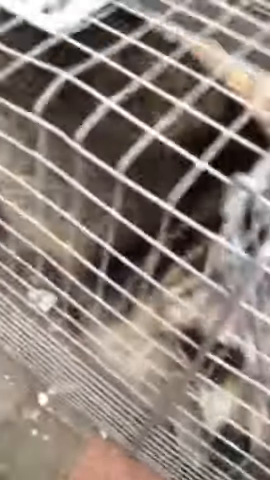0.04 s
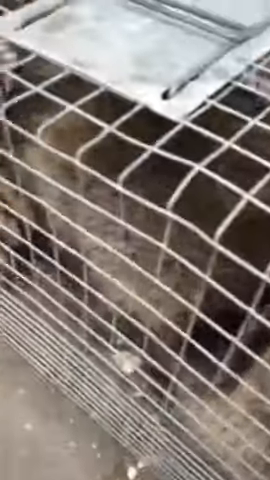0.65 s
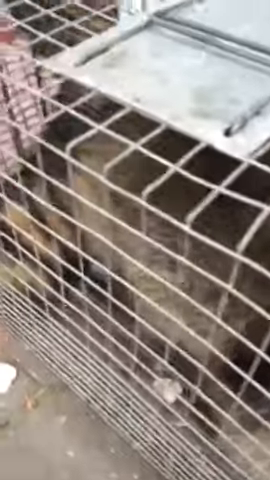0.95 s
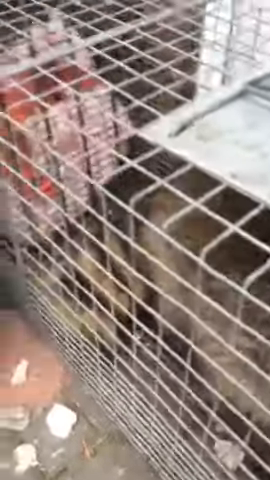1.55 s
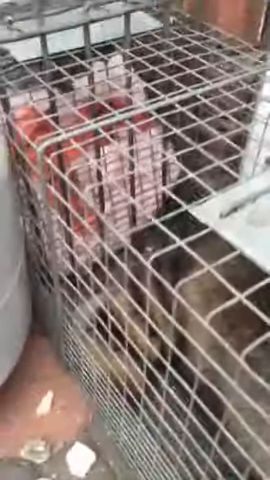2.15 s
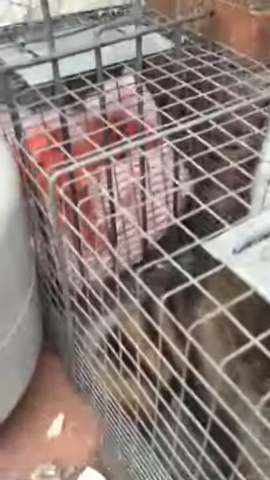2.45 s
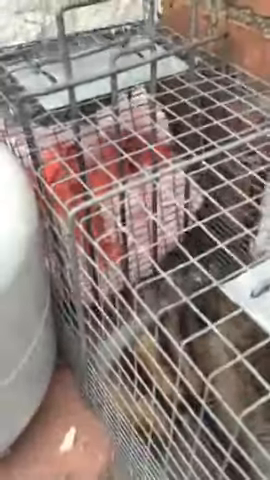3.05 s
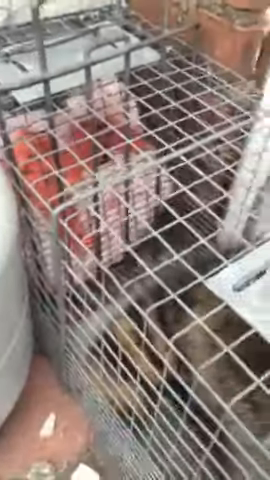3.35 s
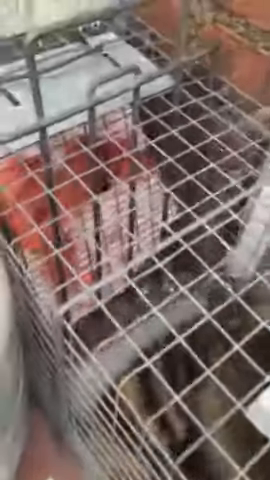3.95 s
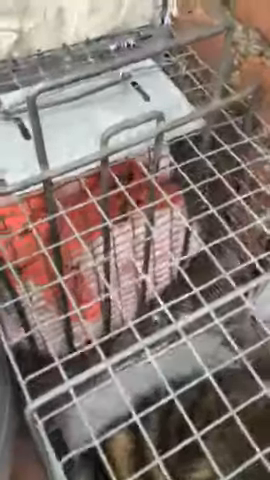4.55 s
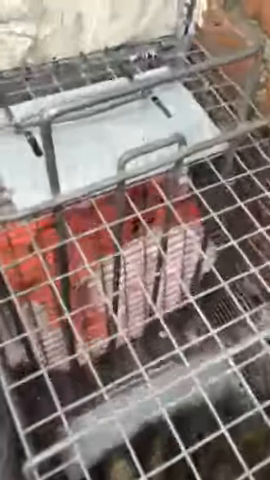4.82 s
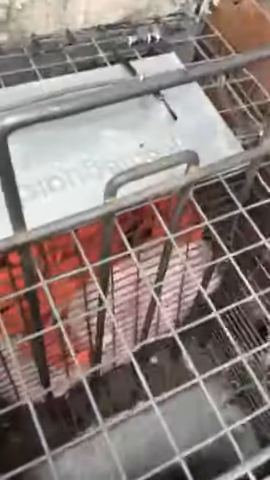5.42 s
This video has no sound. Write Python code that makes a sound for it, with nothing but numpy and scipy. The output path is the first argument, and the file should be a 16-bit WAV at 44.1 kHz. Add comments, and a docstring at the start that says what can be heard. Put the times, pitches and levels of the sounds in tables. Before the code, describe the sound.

Baby raccoons trill in rapid bursts of high, whistled chirps over a low outdoor rumble, with soft microphone bumps.

```python
"""Baby raccoons trill in wire cages on a patio, beside a brick wall.
Each trill is a run of whistled chirps, about 14 a second; between chirps the voice breaks down to a
low dip and climbs back. The harder a cub pushes, the wider its mouth and the more its chirps swell
and turn rough. Under it lie a low outdoor rumble, a machine hum, a few short, bright hisses
and some soft bumps on the hand-held microphone."""
import sys
import numpy as np
from scipy import signal
from scipy.fft import rfft, irfft, next_fast_len
from scipy.io import wavfile
from scipy.ndimage import uniform_filter1d

SR = 44100
rng = np.random.default_rng(int(sys.argv[2]) if len(sys.argv) > 2 else 0)


def output_pcm(signal):
    """Save a mono or channel-first signal as 16-bit PCM at the path in sys.argv[1].

    Samples are clipped to [-1, 1] before scaling.
    """
    pcm = np.clip(np.atleast_2d(signal).T, -1, 1) * 32767
    wavfile.write(sys.argv[1], SR, np.round(pcm).astype(np.int16))


N = 246078
TIME = np.arange(N) / SR


def from_db(db):
    """Turn decibels into a number to multiply by."""
    return 10 ** (np.asarray(db) / 20)


def mean_db(a, b):
    """The level halfway in power between two levels."""
    return 10 * np.log10((from_db(a) ** 2 + from_db(b) ** 2) / 2)


def rms_one(x):
    """Scale a signal to an average power of one."""
    return x / np.sqrt(np.mean(x ** 2) + 1e-20)


def in_time(rows):
    """Join timed points with straight lines, one curve for each column after the time."""
    times, *columns = np.transpose(rows)
    return [np.interp(TIME, times, column) for column in columns]


def humps(rows):
    """A gain that rises and falls around each (time_s, peak_db, width_s)."""
    return sum(from_db(db) * np.exp(-.5 * ((TIME - s) / width) ** 2) for s, db, width in rows)


def bins(x):
    """The frequencies in a signal's spectrum."""
    return np.maximum(np.arange(len(x) // 2 + 1) * SR / len(x), 1)


def colour(x, spectrum, extra_db=0):
    """Shape bass and treble with (freq_hz, gain_db) points, then scale to a power of one."""
    hz, db = np.transpose(spectrum)
    gain = from_db(np.interp(np.log(bins(x)), np.log(hz), db) + extra_db)
    return rms_one(irfft(rfft(x) * gain, len(x)))


def noise(spectrum, size=N):
    """Random noise with the given colour."""
    return colour(rng.standard_normal(size), spectrum)


def drift(size, rate):
    """A smooth random wobble that changes about rate times a second."""
    white = rng.standard_normal(next_fast_len(size + SR // 10))
    smooth = irfft(rfft(white) / (1 + (bins(white) / rate) ** 4), len(white))
    return rms_one(smooth)[:size]


def add(track, start, sound):
    """Mix a sound in at its start time."""
    at = max(round(start * SR), 0)
    track[at:at + len(sound)] += sound[:max(N - at, 0)]


# Colour of the rumble: freq_hz, gain_db
RUMBLE_COLOUR = [(12, -64), (20, -36), (32, -55), (40, -14), (50, -3), (81, 0.5), (102, -6), (118, -4),
                 (136, -6), (166, -20), (209, -42), (300, -27.5), (390, -65), (660, -120)]
# Its brief surges: time_s, peak_db, width_s
SURGES = [(0.14, -46.5, .09), (4.08, -46, 0.033)]
def rumble(steady_db=-44):
    """A deep outdoor rumble that surges twice."""
    return (from_db(steady_db) + humps(SURGES)) * noise(RUMBLE_COLOUR)


# Colour of the rustle: freq_hz, gain_db
RUSTLE_COLOUR = [(100, -0.5), (165, -2.5), (260, -7), (400, -19), (700, -15), (1200, -33), (2500, -41)]
# Its loudness before the trim: time_s, level_db
RUSTLE_LOUDNESS = [(0.0, -54), (0.31, -54), (0.59, -58), (1.06, -67), (1.2, -54.5), (3.59, -55),
                   (4.48, -45), (5.28, -51), (5.58, -50.5)]
def rustle(trim_db=0.5):
    """A low rustle that comes and goes."""
    return from_db(in_time(RUSTLE_LOUDNESS)[0] + trim_db) * noise(RUSTLE_COLOUR)


# Colour of the far-off noise: freq_hz, gain_db
WASH_COLOUR = [(200, -22), (330, 3.5), (430, 2), (600, 1), (1000, -5), (2500, -41)]
# Its loudness before the trim: time_s, level_db
WASH_LOUDNESS = [(0.0, -57), (0.33, -59.5), (1.2, -61.5), (2.11, -56.5), (2.87, -58.5), (4.57, -52.5),
                 (5.21, -71), (5.58, -76)]
def far_wash(trim_db=-3.5):
    """A soft wash of distant outdoor noise that fades near the end."""
    return from_db(in_time(WASH_LOUDNESS)[0] + trim_db) * noise(WASH_COLOUR)


# Colour of the air noise: freq_hz, gain_db
AIR_COLOUR = [(120, -36), (200, 4), (223, -2.5), (253, -5.5), (338, -7.5), (420, -3), (552, -16),
              (792, -9.5), (1060, -7.5), (1320, -9.5), (1490, -12.5), (1640, -12.5), (2530, -19.5),
              (6970, -22), (15200, -40.5)]
def air(level_db=-56.3):
    """The faint, steady hiss of the open air."""
    return from_db(level_db) * noise(AIR_COLOUR)


def wavering_tone(pitch_hz, waver=0.0204, throb_db=3.5):
    """A pure tone whose pitch and loudness wander a little."""
    phase = 2 * np.pi * np.cumsum(pitch_hz * (1 + waver * drift(N, rate=7.5))) / SR
    return from_db(throb_db * drift(N, rate=4.6)) * np.sin(phase)


# The machine's hum over time: time_s, pitch_hz, level_db
HUM_CURVE = [(0, 104, -45), (0.7, 101, -46.5), (1.4, 100, -44), (2.1, 105, -48), (3.9, 106, -43.5),
             (5.58, 107, -56)]
def machine_hum():
    """A machine hums on one low, unsteady note."""
    pitch_hz, level_db = in_time(HUM_CURVE)
    return from_db(level_db) * wavering_tone(pitch_hz)


# The drone's one swell: time_s, peak_db, width_s
DRONE_RISE = [(4.5, -47, 0.15)]
def drone(pitch_hz=249, steady_db=-67.5):
    """A higher tone, faint except for one swell."""
    return (from_db(steady_db) + humps(DRONE_RISE)) * wavering_tone(pitch_hz)


# Two faint swells: time_s, peak_db, width_s
FAR_SWELLS = [(0.42, -53.5, 0.2), (2.1, -58.5, 0.24)]
# Their colour: freq_hz, gain_db
FAR_SWELL_COLOUR = [(250, -30), (340, -3), (420, 4.5), (500, 2), (620, -23), (900, -59)]
def far_swells():
    """Something far off grows and fades with a fairly low sound."""
    return humps(FAR_SWELLS) * noise(FAR_SWELL_COLOUR)


# Bumps on the microphone: start_s, level_db, pitch_hz
MIC_BUMPS = [(0.105, -29, 120), (0.192, -31.5, 115), (1.366, -26.5, 92), (4.11, -23.5, 79),
             (4.86, -31.5, 98), (4.9464, -17.5, 85), (5.003, -31, 101), (5.0301, -30.5, 180)]
def bumps(decay_s=0.0087, tap_db=-17, tap_hz=420, tap_s=0.0024):
    """A knock on the microphone's case gives a brief tap and a low thud that dies quickly."""
    out, t = np.zeros(N), TIME[:SR // 10]
    tap = from_db(tap_db) * np.sin(2 * np.pi * tap_hz * t) * np.exp(-t / tap_s)
    for start, level_db, pitch_hz in MIC_BUMPS:
        thud = np.sin(2 * np.pi * pitch_hz * t) * np.exp(-t / decay_s)
        add(out, start, from_db(level_db) * (thud + tap))
    return out


# Echoes off the ground, cage plate and wall: delay_s, gain_db
NEAR_ECHOES = [(0.0023, -34), (0.0061, -17.5), (0.0099, -14.5)]
# Colour of the cage's ringing: freq_hz, gain_db
RING_COLOUR = [(1000, 9), (2500, 6.5), (3400, 10), (3900, 13.5), (4500, -14), (7000, 11), (14000, -41)]
def patio(x, ring_db=-19, ring_s=0.22):
    """Sound bounces off nearby surfaces and leaves the cage ringing faintly."""
    t = TIME[:SR // 2]
    ring = noise(RING_COLOUR, len(t)) * from_db(-60 * t / ring_s)
    response = from_db(ring_db) * rms_one(ring) / np.sqrt(len(t))
    response[0] = 1  # the sound that arrives directly
    for delay, db in NEAR_ECHOES:
        response[round(delay * SR)] += from_db(db)
    return signal.fftconvolve(x, response)[:N]


# Short hisses: time_s, peak_db, width_s
SHORT_HISSES = [(0.136, -63, 0.0036), (0.564, -51, 0.0032), (0.635, -51.5, 0.024), (3.548, -48, 0.0032),
                (3.551, -54.5, 0.025), (3.752, -61.5, 0.02), (4.215, -62, 0.0052)]
# Their colour: freq_hz, gain_db
HISS_COLOUR = [(600, -24), (1200, 8.5), (3000, 0), (5500, 6.5), (8000, -3.5), (12000, -4), (15000, -13)]
def short_hisses():
    """Short, bright hisses: the breathy edge of a cub's squeal, and light scrapes."""
    return humps(SHORT_HISSES) * noise(HISS_COLOUR)


def note_clock(length, fade_s=0.008):
    """Time within a note, and soft edges that overlap its neighbours."""
    t = np.arange(int((max(length, fade_s) + fade_s) * SR)) / SR - fade_s / 2
    edge = np.clip(np.minimum(t - t[0], t[-1] - t) / fade_s, 0, 1)
    return t, np.sin(edge * np.pi / 2)


def low_level(level_db, chirp_db, follows=0.52, usual_chirp_db=-45):
    """The voice's low parts change less in loudness than its chirps do."""
    return level_db + follows * (chirp_db - usual_chirp_db)


# Voice settings from gentle to harsh (doubling is how much every second vibration differs):
# overtone_db, doubling_0_to_1, swell_db, chirp_mouth_hz, dip_mouth_hz, dip_rasp_0_to_1
EFFORT_STEPS = [(-60, .4, -4.5, 2700, 3000, 0.4), (-59, 0.5, -6, 3800, 2700, 0.7),
                (-42.5, 0.28, -2, 4300, 2370, 0.52), (-37.5, 1, 3, 4280, 3080, 0.63)]
def effort(overtone_db):
    """Look up the voice's settings; louder overtones mean the cub is pushing harder."""
    levels, *settings = np.transpose(EFFORT_STEPS)
    return [np.interp(overtone_db, levels, setting) for setting in settings]


# Colour of the throat, changing between trills: start_s, list of (freq_hz, gain_db)
THROAT_COLOURS = [ (0.0, [(1500, -25), (2500, -3), (3050, -0.5), (3600, -7.5), (4350, 2.5), (4700, -2),
                  (5330, -1), (6700, -18), (7700, -4), (8400, -9), (11000, -22), (14500, -25)]),
                  (0.8, [(1500, -1), (2700, 0), (3400, -10), (4500, -8.5), (5600, -11), (7000, -8.5),
                  (8000, -21), (10000, -20), (14500, -48)]), (2.0, [(1500, -22), (2550, -4), (2950, -1.5),
                  (3500, 4), (3850, 7), (4300, -6), (4900, -12), (6400, -15.5), (9000, -34), (14500, -45)]),
                  (4.0, [(1500, -9), (2200, -2.5), (2600, 3.5), (2900, 2.5), (3320, -10), (3850, 3),
                  (4640, -4.5), (5050, -8.5), (5540, -4), (6170, -10.5), (6850, -8), (7500, -18.5),
                  (9500, -26), (14500, -38)]), (5.1, [(1500, -10), (2400, 1.5), (2810, -5), (3190, -4),
                  (3720, 2.5), (4050, -1.5), (4680, 2.5), (5030, -4), (5450, -13.5), (6000, -11),
                  (6500, -12.5), (7400, -6.5), (9600, -22.5), (14500, -37)]), ]
def voice(start, pitch, tone_db, overtone_db, mouth_hz, rasp, doubling,
          undertone_db=-90, mouth_octaves=0.52, mouth_depth_db=5):
    """Vocal folds make a tone, throat and mouth shape its overtones, and rasp adds shake and hiss."""
    waver, jitter_radians, hiss, tremble_db = 0.015, 0.36, 0.75, 2.5
    size, rasp = len(pitch), np.clip(rasp, 0, 1)
    phase = 2 * np.pi * np.cumsum(pitch * (1 + waver * drift(size, rate=170))) / SR
    phase = phase + jitter_radians * rasp * drift(size, rate=720)
    # in a very hoarse note even the main tone turns to noise
    hoarse = rms_one(1 - rasp ** 3 + rasp ** 3 * drift(size, rate=790))
    # when every second vibration differs, tones appear an octave down and between the overtones
    undertone = from_db(undertone_db) * rms_one(np.sin(phase / 2))
    tone = from_db(tone_db) * rms_one(np.sin(phase)) + undertone
    whole = sum(np.sin(k * phase + rng.uniform(0, 2 * np.pi)) for k in range(2, 7))
    between = sum(np.sin((k - .5) * phase + rng.uniform(0, 2 * np.pi)) for k in range(2, 7))
    breath = rng.standard_normal(size) * (1 + .5 * np.sin(phase))
    source = rms_one(whole + doubling * between) * (1 - rasp ** 2) + hiss * rasp ** 2 * breath
    throat = [points for since, points in THROAT_COLOURS if since <= max(start, 0)][-1]
    octaves_away = np.log2(bins(source) / mouth_hz)
    mouth_db = -mouth_depth_db * np.log10(1 + (octaves_away / mouth_octaves) ** 4)
    overtones = colour(source, throat, mouth_db)
    # steady lung pressure holds the loudness even, however rough the voice
    overtones = overtones / np.sqrt(uniform_filter1d(overtones ** 2, size=130) + 1e-9)
    tremble = rms_one(from_db(tremble_db * drift(size, rate=117)))
    return tremble * (hoarse * tone + from_db(overtone_db) * overtones)


# The cubs' chirps, from faint whimpers to harsh trills (the accent is for the dip that follows):
# start_s, end_s, pitch_hz, glide_octaves, tone_db, overtone_db, rasp_0_to_1, accent_db
CUB_CHIRPS = [ (0.004, 0.034, 2150, -0.22, -58, -82, 1, -11), (0.056, 0.108, 2150, 0, -59.5, -65, .9, -2),
              (0.112, 0.126, 1680, -0.27, -50, -77, .15, -18),
              (0.407, 0.439, 2170, 0.24, -53.5, -64, 0.76, 0),
              (0.468, 0.496, 2230, -0.12, -44, -50, 0.66, 5), (0.517, 0.556, 2320, 0.14, -42, -47, .2, 6),
              (0.588, 0.626, 2150, -0.13, -41, -37, 0.4, 8.5),
              (0.65, 0.659, 1950, -.2, -41.5, -52, .3, -14),
              (0.907, 0.941, 1080, 0.066, -53, -62.5, 0.85, 5), (0.953, 0.985, 2150, .15, -57, -79, 0.6, 6),
              (1.035, 1.067, 2110, 0.18, -52.5, -84, .25, 9), (1.101, 1.136, 2180, 0.27, -45, -69, 0.4, 11),
              (1.176, 1.207, 2220, 0.13, -41, -60, 0.2, 10), (1.227, 1.264, 2220, 0.23, -42, -63, 0.3, 8),
              (1.29, 1.347, 2130, 0.23, -41.5, -63, 0.47, 3),
              (1.366, 1.412, 2170, .15, -37.5, -60.5, 0.35, 3),
              (1.434, 1.475, 2020, 0.078, -40.5, -63, 0.45, 0),
              (1.478, 1.527, 2310, -0.081, -55, -64, 0.68, 0),
              (1.53, 1.577, 1720, -0.38, -54.5, -71, .8, -7),
              (2.114, 2.131, 1390, -0.27, -53, -71, 0.84, -12),
              (2.157, 2.19, 1920, 0.016, -59, -69, 0.66, -7),
              (2.292, 2.346, 1850, 0.074, -50.5, -74, 0.69, 3),
              (2.361, 2.393, 1880, 0.071, -43, -64, 0.52, 0),
              (2.393, 2.426, 2130, -.12, -54.5, -70, 0.8, -7),
              (2.453, 2.496, 2080, -0.23, -56.5, -68, 1, -13),
              (2.512, 2.56, 2070, 0.008, -52.5, -80, 0.76, -6),
              (2.585, 2.614, 1800, -.2, -56.5, -76, 0.65, -6), (2.985, 3.001, 2020, -.2, -55, -70, .25, 8),
              (3.037, 3.064, 2180, 0.056, -59.5, -84, .3, -3),
              (3.103, 3.129, 2150, -0.022, -47, -58.5, 0.63, 4),
              (3.154, 3.18, 2100, 0.17, -45, -43, .45, 16),
              (3.21, 3.257, 2080, 0.19, -51.5, -49.5, 0.68, 9.5),
              (3.279, 3.347, 2000, -0.078, -57, -54.5, 0.83, -8),
              (4.034, 4.078, 1450, 0.14, -53, -63, 0.87, -13),
              (4.099, 4.126, 1680, -0.38, -55.5, -65, 0.4, 8),
              (4.17, 4.197, 1930, 0.061, -47, -55, 0.7, 12), (4.219, 4.26, 2030, 0.22, -46, -58, 0.81, -2),
              (4.31, 4.335, 1820, -0.34, -40.5, -37.5, .35, 11.5),
              (4.364, 4.401, 2060, 0.27, -44, -44, 0.72, 7.5),
              (4.444, 4.478, 1860, -0.25, -42.5, -33, 0.62, 10),
              (4.511, 4.546, 2170, 0.21, -41, -41, 0.4, 10.5),
              (4.57, 4.606, 2186, 0.22, -40.5, -33, 0.65, 0),
              (4.603, 4.624, 2440, -.04, -41.5, -47.5, 0.1, 10),
              (4.643, 4.694, 2170, 0.22, -42, -33, 0.67, 5),
              (4.723, 4.769, 1950, -0.4, -44.5, -39, 0.68, 4.5),
              (4.788, 4.843, 1870, -0.36, -52, -51.5, 0.78, -6),
              (5.191, 5.214, 1830, -0.024, -60, -50.5, .1, 0),
              (5.208, 5.23, 1870, -0.1, -55.5, -45.5, 0.86, 1),
              (5.237, 5.284, 1900, 0.087, -63, -54, 0.7, -1),
              (5.328, 5.361, 1850, 0.088, -45, -36.5, 0.53, 1.5),
              (5.398, 5.423, 2020, 0.076, -41.5, -39, 0.66, 5.5),
              (5.464, 5.5, 2000, -0.09, -41.5, -34, 0.62, 4),
              (5.529, 5.56, 1820, -0.17, -49.5, -35, 0.73, 5.5)]
def chirps(onset_db=-4, onset_s=0.0084, arch_octaves=0.064, undertone_db=-60.5):
    """High whistled notes ease in and glide along a shallow arch; hard-pushed ones swell as they go."""
    out = np.zeros(N)
    for start, end, pitch_hz, glide, tone_db, overtone_db, rasp, _ in CUB_CHIRPS:
        doubling, swell_db, mouth_hz, _, _ = effort(overtone_db)
        t, edges = note_clock(end - start)
        along = np.linspace(0, 1, len(t))
        arch = np.sin(np.pi * along) - 2 / np.pi
        pitch = pitch_hz * 2 ** (glide * (along - .5) + arch_octaves * arch)
        ease_db = onset_db * np.exp(-np.maximum(t, 0) / onset_s)
        push = rms_one(from_db(swell_db * along + ease_db))
        note = voice(start, pitch, tone_db, overtone_db, mouth_hz, rasp, doubling,
                     low_level(undertone_db, tone_db))
        add(out, start + t[0], edges * push * note)
    return out


def dips(low_hz=1366, low_db=-53.5, fall_s=0.00675, climb_s=0.0048, accent_s=0.013, sag_db=-2):
    """After a chirp the voice breaks down to a low note, sags a little and starts to climb back."""
    shortest_gap_s, longest_gap_s, release_s = .008, .058, .022
    out = np.zeros(N)
    for chirp, following in zip(CUB_CHIRPS, CUB_CHIRPS[1:] + CUB_CHIRPS[-1:]):
        _, start, _, _, tone_db, overtone_db, _, accent_db = chirp  # starts where the chirp ends
        next_start, _, _, _, next_tone_db, next_overtone_db, _, _ = following
        length = next_start - start
        if following is chirp or length > longest_gap_s:
            length = release_s  # only a short dip before a pause
        elif length < shortest_gap_s:
            continue
        else:
            tone_db = mean_db(tone_db, next_tone_db)
            overtone_db = mean_db(overtone_db, next_overtone_db)
        _, _, _, mouth_hz, rasp = effort(overtone_db)
        t, edges = note_clock(length)
        since = np.maximum(t, 0)
        fall = 0.34 * np.exp(-since / fall_s)
        climb = 0.107 * np.exp(np.minimum(t - length, 0) / climb_s)
        pitch = low_hz * (1 + fall + climb)
        break_db = accent_db * np.exp(-(since / accent_s) ** 4) + sag_db * since / length
        tone_db = low_level(low_db, tone_db) + 0.6 * break_db
        overtone_db = overtone_db - 3 + break_db
        # the half-closed mouth lets a narrower band of overtones through
        note = voice(start, pitch, tone_db, overtone_db, mouth_hz, rasp,
                     doubling=0.2, mouth_octaves=0.57, mouth_depth_db=6.5)
        add(out, start + t[0], edges * note)
    return out


def scene():
    """The cubs in their cages over the outdoor background."""
    cubs = patio(chirps() + dips() + short_hisses())
    background = rumble() + rustle() + far_wash() + air() + machine_hum() + drone() + far_swells()
    return (cubs + background + bumps())[None]


def record(dry, low_cut_hz=41, high_cut_hz=15150):
    """The small microphone drops the deepest bass; the highest treble is cut steeply."""
    bass_cut = signal.butter(2, low_cut_hz, "high", fs=SR, output="sos")
    treble_cut = signal.ellip(10, .1, 70, high_cut_hz, fs=SR, output="sos")
    return signal.sosfilt(treble_cut, signal.sosfilt(bass_cut, dry))


dry = scene()
out = record(dry)
output_pcm(out)
```